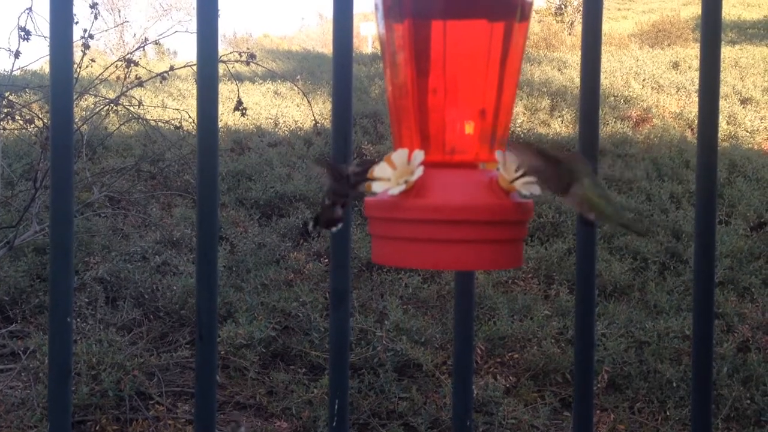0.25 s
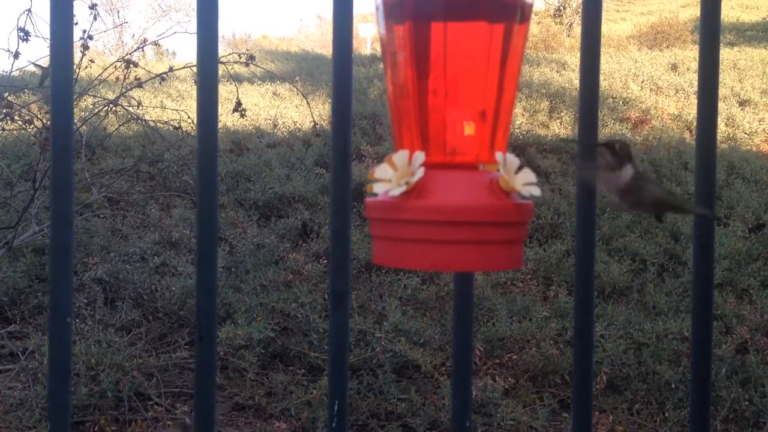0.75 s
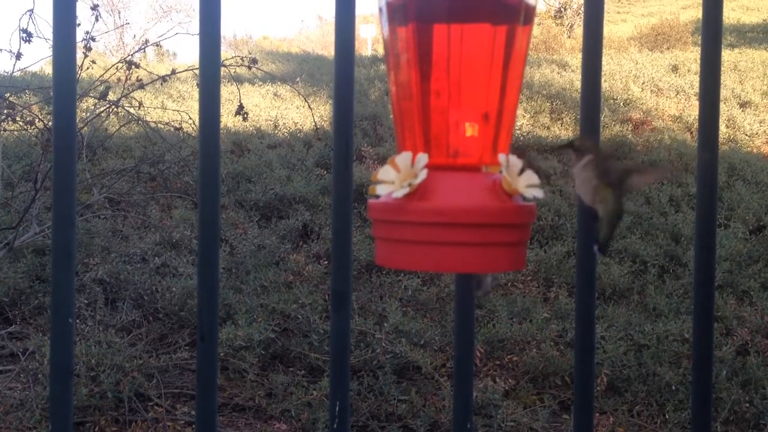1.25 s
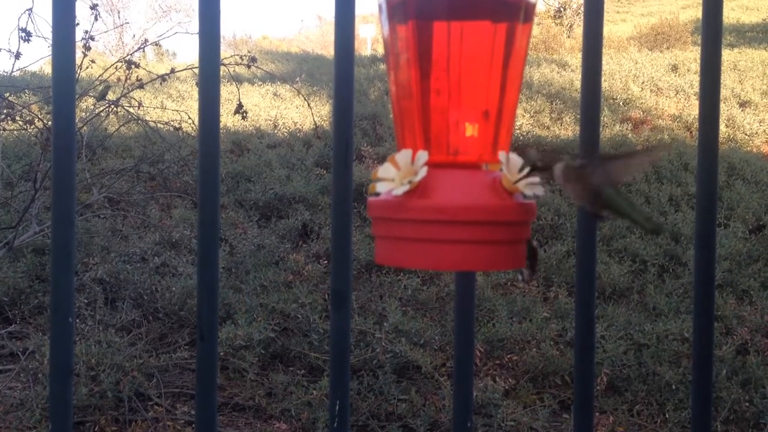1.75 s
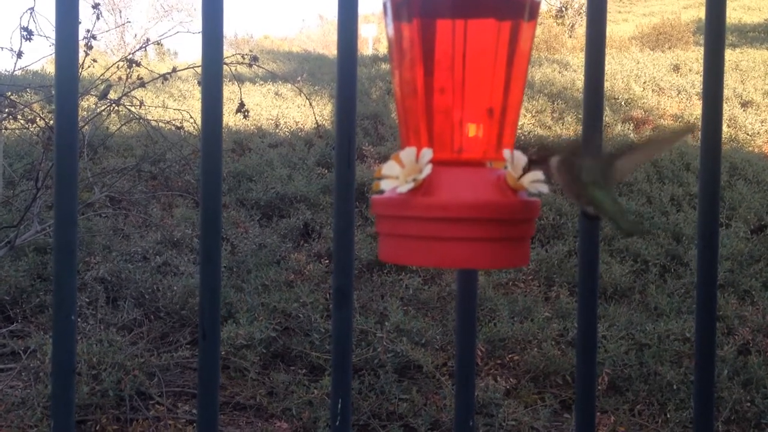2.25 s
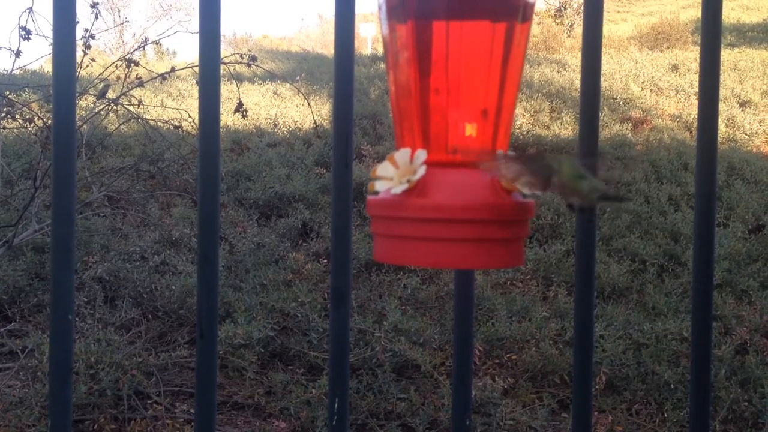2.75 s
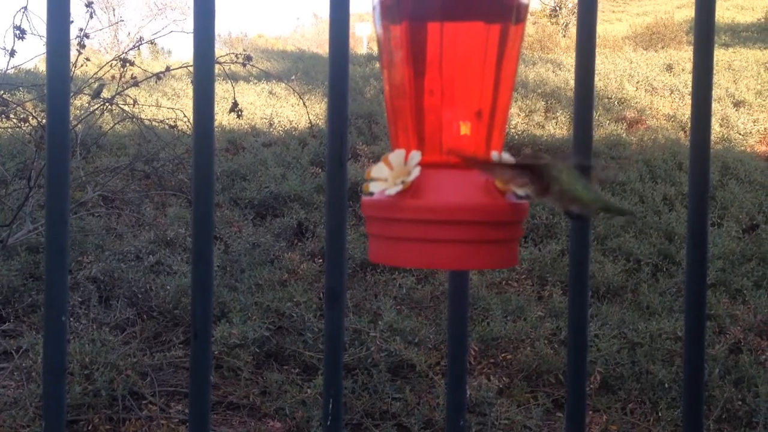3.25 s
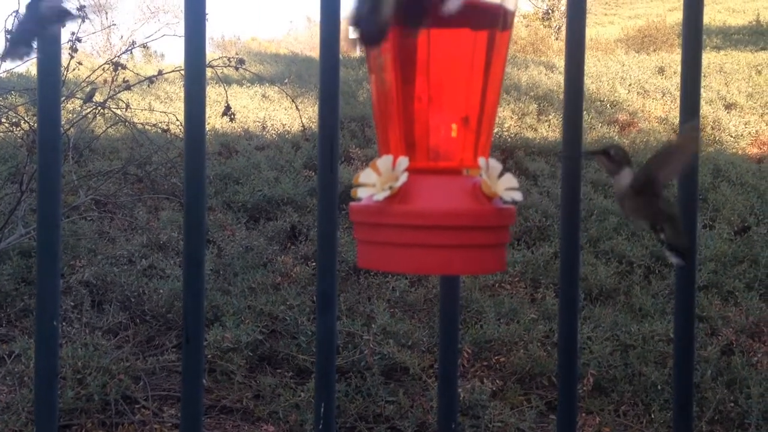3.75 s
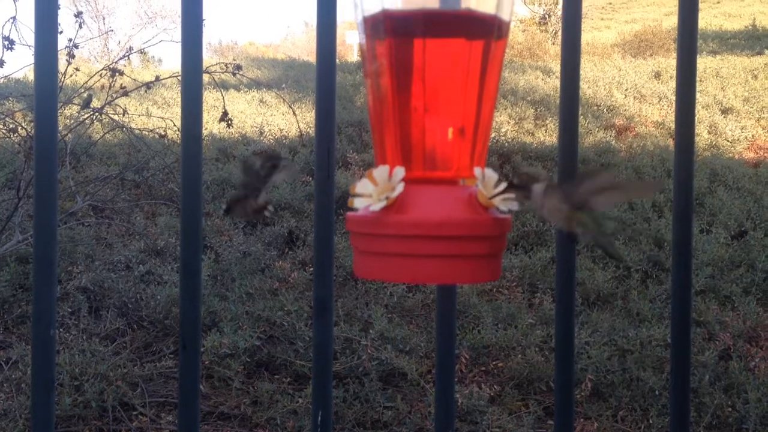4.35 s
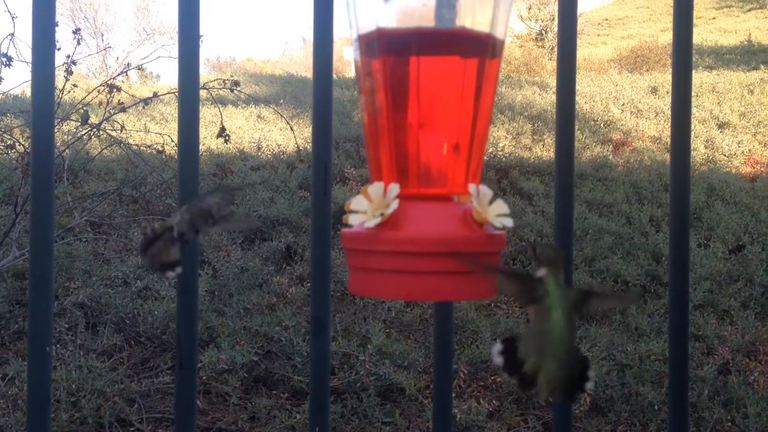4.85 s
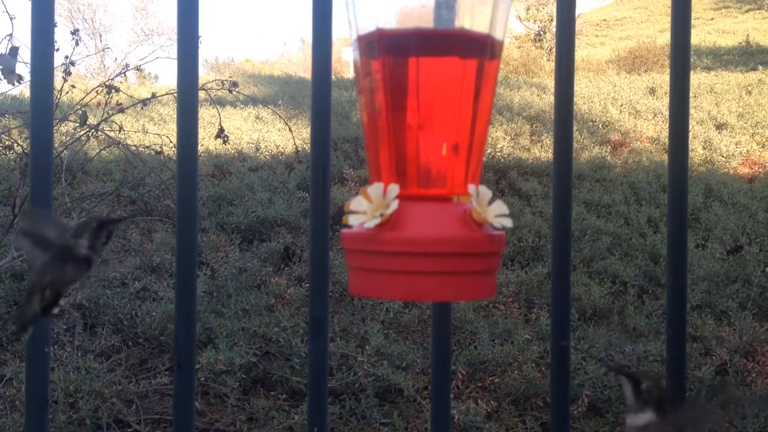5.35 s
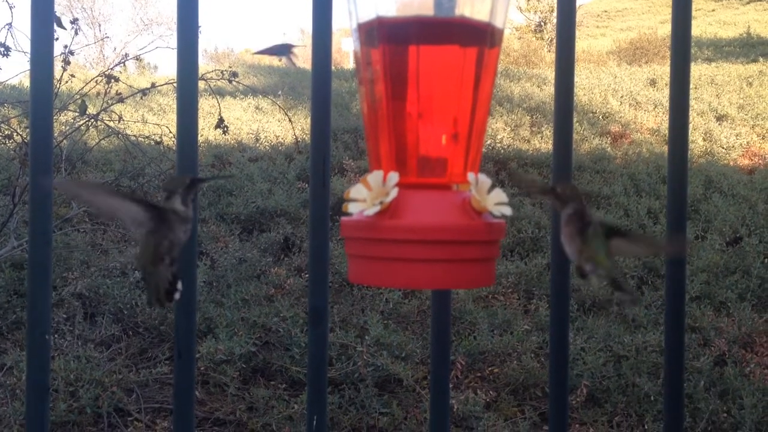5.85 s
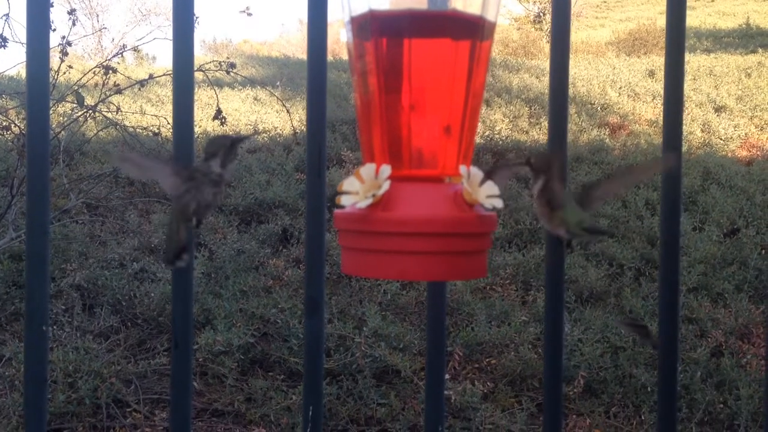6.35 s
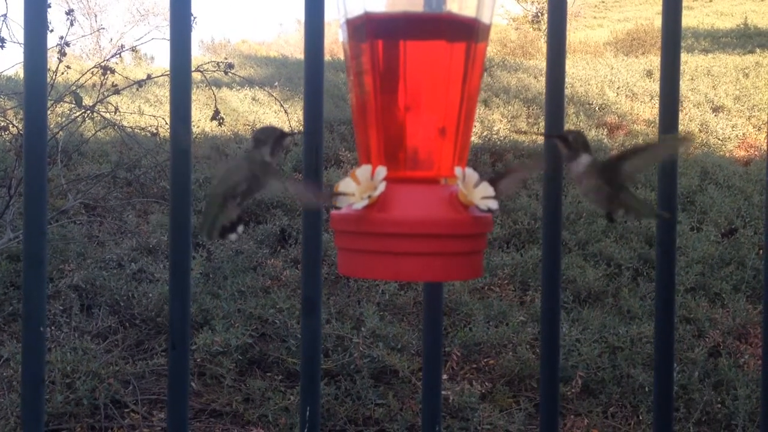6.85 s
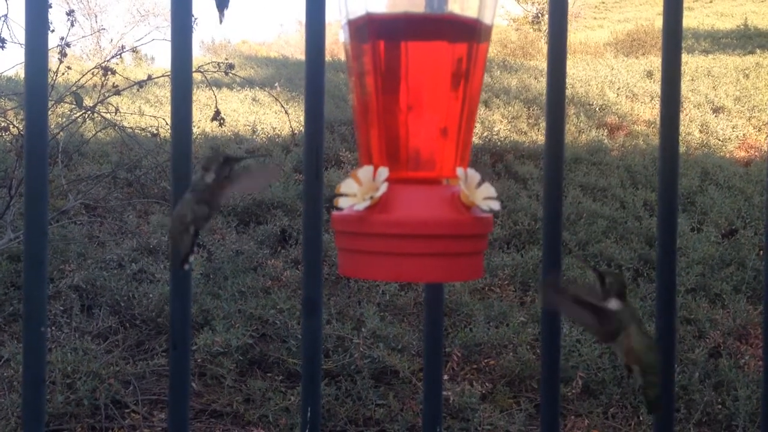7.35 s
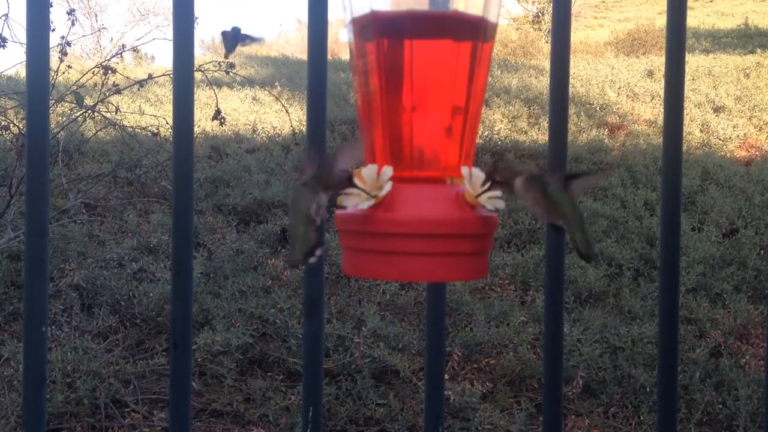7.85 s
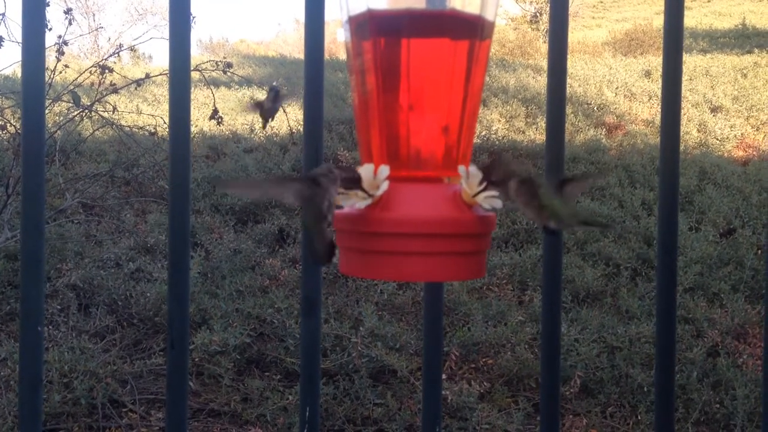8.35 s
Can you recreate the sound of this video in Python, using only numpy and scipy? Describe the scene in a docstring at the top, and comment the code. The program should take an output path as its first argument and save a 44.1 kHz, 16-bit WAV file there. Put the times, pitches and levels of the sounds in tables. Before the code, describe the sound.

Hummingbirds hover at a garden feeder close to the microphone, their wings making a low hum that swells and fades. Sharp, very high chips and a few thin twitters come throughout. Midway the squabble peaks with raspy squeals, a quick run of harsh chatter and soft thumps of air as the birds turn. More twitters and chips follow, with faint distant calls and a quiet outdoor hiss behind.

```python
"""Hummingbirds squabble at a garden feeder, close to the microphone.
The syrinx whistles rising chips, swinging twitters and scalloped squeals; harsh chatter falls through
the throat's resonances. Two pairs of wings hum at about 40-55 beats a second, stir eddies, thump the air
in sharp turns and once pass with a faint, rough swish. Fence and wall scatter the near calls, while far
birds buzz from the bushes over a quiet outdoor hiss."""
import sys
import numpy as np
from scipy import signal
from scipy.fft import rfft, irfft, next_fast_len
from scipy.io import wavfile
from scipy.ndimage import map_coordinates

SR = 44100
rng = np.random.default_rng(int(sys.argv[2]) if len(sys.argv) > 2 else 0)


def dump(signal):
    """Clip the signal to [-1, 1] and save it as 16-bit WAV at the path in sys.argv[1]."""
    limited = np.clip(np.atleast_2d(signal).T, -1, 1)
    pcm = np.round(limited * 32767).astype(np.int16)
    wavfile.write(sys.argv[1], SR, pcm)


N = 379701
TIME = np.arange(N) / SR

# hover of the slow-winged and the fast-winged bird: (time [s], wingbeat rate [Hz], level [dB])
SLOW_HOVER = [(0, 45, -59), (.29, 44.7, -53.5), (.46, 46.4, -64), (.76, 45.7, -43), (1.05, 43.7, -55.5),
              (2.1, 43.2, -59.5), (2.6, 41.3, -52), (2.95, 40.5, -52), (3.2, 39.6, -47.5),
              (3.5, 40.4, -55.5), (3.8, 44.2, -48.5), (4.75, 39, -49), (5.3, 44, -45.5), (6.06, 41, -57.5),
              (6.2, 41, -49), (7.2, 45, -55), (7.38, 45.1, -50), (7.6, 44.5, -60), (8.61, 45, -61)]
FAST_HOVER = [(0, 48.3, -60.5), (.75, 52.3, -58), (1, 52, -54.5), (1.75, 51, -53), (2.3, 50.7, -51.5),
              (3.2, 50.6, -54), (3.7, 48.3, -51), (4.05, 51.4, -51.5), (4.45, 49.7, -52.5),
              (4.68, 50.2, -65), (4.9, 51.7, -51.5), (5.3, 51, -53), (5.72, 57.3, -56), (5.87, 48, -47.5),
              (6.02, 52, -58), (6.26, 52.4, -53.5), (6.95, 53.2, -59), (7.2, 50.6, -46),
              (7.75, 52.7, -56.5), (8.15, 50.6, -52.5), (8.61, 49, -58)]
# timbre of each hum, from the first harmonic up: (relative level [dB])
SLOW_HUM_DB = [-15, -1, -5.5, -5.5, -12.5, -22.5, -25, -23.5, -23.5, -27]
FAST_HUM_DB = [-5.5, -2, 1.5, 0, -7.5, -12.5, -18, -18, -20.5, -24.5]
# swoops past the microphone: (closest time [s], fade time [s], eddy send [dB], swish send [dB])
FLY_BYS = [(.3, 0.43, -59, -67.5), (.78, .04, -52, -71), (2.28, 0.027, -54, -65.5), (2.39, 0.044, -56, -71),
           (2.68, 0.14, -67.5, -76), (3.69, 0.093, -48.5, -64.5), (4.05, 0.43, -68, -71.5),
           (4.47, 0.034, -53.5, -76), (4.88, 0.051, -54.5, -65), (5.08, 0.053, -58, -61),
           (5.18, 0.035, -53, -64), (5.37, 0.12, -52.5, -60), (5.571, 0.029, -45, -75),
           (5.809, 0.013, -45.5, -75), (6.24, .06, -61, -72), (6.72, 0.12, -75, -72),
           (7.2, .05, -57.5, -60.5), (7.41, 0.093, -60.5, -62.5), (8.1, 0.066, -65.5, -67),
           (8.5, 0.016, -62, -66)]
# colour of wing eddies, feather swish and garden hiss: (frequency [Hz], relative level [dB])
EDDY_EQ = [(30, -34), (50, 0), (120, 5), (250, -0.5), (400, -6.5), (550, -12), (800, -29), (1500, -58)]
SWISH_EQ = [(400, -8.5), (950, -2.5), (1800, -3), (2800, -10), (3800, -6), (7000, -14.5), (15000, -24)]
GARDEN_EQ = [(240, -42), (400, -9), (694, -11), (1000, -9), (1150, -10.5), (1690, -8.5), (2710, -16),
             (3510, -11.5), (8150, -16), (11100, -17), (14600, -17), (15500, -23)]
# calls of birds further off: (time [s], length [s], pitch [Hz], relative level [dB])
BUSH_CALLS = [ (.003, 0.012, 7740, -56), (0.181, 0.044, 8000, -61.5), (0.184, 0.038, 4890, -62.5),
              (0.262, 0.025, 7000, -59), (2.898, 0.024, 6780, -63), (3.143, 0.017, 6500, -59),
              (3.241, 0.012, 5180, -57), (3.308, 0.022, 7380, -62), (3.378, 0.013, 6600, -62.5),
              (7.619, 0.032, 7400, -63.5), (8.015, 0.044, 7220, -63), (8.019, 0.033, 4410, -62),
              (8.078, .032, 7377, -58.5), (8.080, 0.029, 4420, -66), (8.263, .020, 4206, -64),
              (8.254, 0.036, 7610, -64)]
# rising chips: (time [s], length [s], top pitch [Hz], level [dB])
PLAIN_CHIPS = [(0.08, 0.023, 10300, -30), (0.684, 0.015, 8830, -31), (1.356, .022, 10360, -38),
               (1.796, 0.016, 9996, -46.5), (2.377, .021, 10240, -36.5), (2.660, 0.02, 9680, -37.5),
               (2.947, 0.014, 9160, -38.5), (3.098, 0.014, 9390, -35.5), (3.634, 0.016, 9170, -42.5),
               (3.783, .0127, 9300, -36.5), (3.917, 0.016, 9280, -30.5), (4.328, 0.017, 9415, -31),
               (4.474, 0.015, 8970, -30.5), (4.910, 0.015, 8770, -32.5), (5.04, 0.017, 8880, -31.5),
               (5.938, 0.016, 9670, -30), (6.121, 0.013, 8800, -37), (6.841, 0.017, 9390, -29.5),
               (7.385, 0.019, 10080, -31.5), (7.844, 0.013, 9050, -36.5)]
# chips that shake at the top: (time [s], length [s], first pitch [Hz], top pitch [Hz], level [dB])
WARBLED_CHIPS = [(6.219, 0.023, 5300, 10000, -30.5), (6.314, 0.019, 8280, 9670, -28)]
# wing-tip flicks, single or in runs: (time [s], length [s], band centre [Hz], level [dB])
TIP_FLICKS = [(.593, .01, 3340, -59), (1.392, .01, 3710, -59), (3.748, .01, 3380, -48.5),
              (3.822, .01, 3200, -57), (5.489, .01, 1900, -50), (5.647, .01, 3800, -56),
              (7.17, .03, 3650, -50.5), (7.397, .09, 910, -54)]
# sharp turns of one or more hard strokes: (time [s], length [s], thump pitch [Hz], peak level [dB])
SHARP_TURNS = [(.740, .05, 138, -35.5), (2.383, .03, 98, -36), (3.603, .05, 83, -29),
               (3.658, .05, 205, -28), (3.729, .03, 153, -29), (3.932, .01, 100, -33.5),
               (4.444, .05, 161, -31.5), (4.636, .01, 80, -36), (4.764, .01, 90, -33),
               (4.864, .03, 165, -32.5), (5.163, .03, 171, -29), (5.23, .01, 110, -29),
               (5.286, .01, 129, -30.5), (5.55, .01, 101, -28.5), (5.573, .01, 270, -22),
               (5.61, .01, 169, -25.5), (5.809, .01, 260, -28.5), (5.902, .01, 140, -30.5),
               (5.968, .01, 90, -36.5), (6.363, .01, 61.5, -32.5)]
# short rasps; the one at 7.165 s is the faint, rough swish of passing wings, the rest are chatter:
# (time [s], length [s], first pitch [Hz], last pitch [Hz], roughness [0-1], tilt [dB/octave], level [dB])
RASPS = [ (1.047, 0.023, 2000, 1454, 0.07, -4.5, -45.5), (1.187, 0.033, 2006, 1655, 0.87, -5.5, -55),
         (1.495, .009, 2490, 1740, .6, -7, -52.5), (2.061, .023, 2390, 1576, 0.28, -3.5, -50),
         (2.248, 0.016, 2045, 1460, 0.3, 2, -42.5), (2.267, 0.025, 1890, 1470, 0.1, -1, -44),
         (2.704, 0.021, 2405, 1594, 0.3, -6, -43.5), (4.54, 0.026, 1900, 1494, 0.2, -0.5, -44.5),
         (4.825, .024, 2448, 1580, 0.46, -1, -51), (5.27, 0.032, 2600, 1500, 0.36, 0, -43),
         (5.371, 0.029, 4130, 1604, 0.11, 0.5, -33), (5.437, .031, 4240, 1560, 0.1, -0.5, -34.5),
         (5.51, 0.029, 4360, 1526, 0.25, 0.5, -34), (5.587, 0.033, 4070, 1580, 0.2, -0.5, -37.5),
         (5.678, 0.03, 4200, 1615, 0.3, -.5, -42), (5.776, .031, 4110, 1464, 0.23, -1.5, -39.5),
         (6.531, .016, 2250, 1550, .6, -7, -51), (6.894, 0.043, 2140, 1435, 0.23, -5.5, -53),
         (7.165, 0.054, 1943, 1600, 0.93, -5, -60), (7.374, .016, 2455, 1600, .55, -4.5, -50.5),
         (7.551, 0.028, 2285, 1435, .45, 1, -48), (7.665, 0.02, 2330, 1566, 0.36, -8.5, -48.5),
         (7.886, 0.016, 2320, 1590, 0.6, -6.5, -52.5), (8.499, 0.013, 2300, 1634, 0.42, -7.5, -46.5)]
# colour of the rasps; in the chatter, the resonances of throat and open bill: (frequency [Hz], gain [dB])
RASP_EQ = [(1300, -1), (1650, 1.5), (2000, -2.5), (2400, 7), (2900, -5.5), (3900, 1.5), (5300, 3.5),
           (7000, -0.5), (9000, -9), (12000, -15.5), (15000, -20)]
# twitters: (time [s], length [s], swing period [s], low pitch [Hz], high pitch [Hz], level [dB])
TWITTER_NOTES = [ (1.615, 0.11, 0.019, 6600, 11200, -43), (2.21, 0.0994, 0.019, 6700, 11180, -42.5),
                 (6.04, 0.08, 0.022, 6500, 11150, -29.5), (6.565, 0.03, .0212, 5550, 10850, -30.5),
                 (6.682, 0.036, 0.024, 5900, 10700, -30)]
# squeals, one curve each:
# (time [s], top pitch [Hz], dip depth [Hz], dip rate [Hz], roughness [0-1], level [dB])
SQUEAL_CURVES = [
    [(3.986, 6540, 200, 79, 0, -30.5), (4.014, 6600, 1620, 74, .05, -30), (4.066, 6620, 1670, 69, 0, -36),
     (4.085, 6420, 800, 76, .3, -36), (4.100, 6420, 900, 200, 0.1, -48.5),
     (4.135, 5400, 1950, 270, 0.5, -39), (4.144, 5290, 2250, 240, 1, -48)],
    [(5.063, 6700, 1600, 80, 0.1, -53), (5.076, 6730, 1630, 80, 0.02, -34), (5.088, 6700, 910, 74, .3, -45),
     (5.102, 6540, 1570, 81, 0.3, -33.5), (5.145, 6510, 2360, 81, 0.33, -33),
     (5.168, 6403, 2840, 77, 0.46, -40.5), (5.183, 5700, 3370, 84, .77, -40.5)],
    [(5.240, 5680, 2096, 247, .5, -39), (5.253, 5950, 2294, 233, 0.54, -30),
     (5.272, 5500, 2337, 220, 0.67, -34), (5.285, 4700, 2300, 255, 0.7, -39)],
]

TOP_HZ = 15550  # upper edge of the rasps and of the microphone


def undb(db):
    """Decibels to gain."""
    return 10 ** (np.asarray(db) / 20)


def unit(x):
    """Scale to rms 1."""
    return x / np.sqrt(np.mean(x ** 2))


def curves(rows, t):
    """The columns of a curve table at times t."""
    s, *columns = np.transpose(rows)
    return [np.interp(t, s, c) for c in columns]


def response(eq, hz):
    """Gain of an EQ curve at hz."""
    f, db = np.transpose(eq)
    return undb(np.interp(np.log(np.maximum(hz, 1)), np.log(f), db))


def noise(eq):
    """Noise coloured by an EQ curve, rms 1."""
    size = next_fast_len(N, True)
    spectrum = rfft(rng.standard_normal(size)) * response(eq, np.fft.rfftfreq(size, 1 / SR))
    return unit(irfft(spectrum, size)[:N])


def walk(rate, size=N):
    """Random modulator that glides to a new value rate times a second; spread near 1."""
    at = np.arange(size) * rate / SR
    return map_coordinates(rng.standard_normal(int(at[-1]) + 2), [at], order=1)


def phase_of(hz):
    """Running phase of a frequency curve."""
    return 2 * np.pi * np.cumsum(hz) / SR


def span(length):
    """Time axis of one sound."""
    return np.arange(int(max(length, .004) * SR)) / SR


def gate(t, attack, release):
    """Smooth fade in and out of a sound."""
    fade_in = np.sin(np.pi / 2 * np.clip(t / attack, 0, 1))
    return fade_in * np.sin(np.pi / 2 * np.clip((t[-1] - t) / release, 0, 1))


def add(track, s, sound):
    """Mix a sound into the track at time s."""
    i = max(int(s * SR), 0)
    track[i:i + len(sound)] += sound[:N - i]


def strokes(s, length, gap_s=.0205):
    """Times of the wing strokes in a run."""
    return s + np.arange(0, length, gap_s)


def hover(rows, harmonics_db, swoop, jitter, flutter, wander=.04):
    """Lift pulses on each stroke hum, the harmonics shifting as the bird tilts; returns hum and phase."""
    hz, db = curves(rows, TIME)
    phase = phase_of(hz * (1 + wander * walk(9) + jitter * walk(35)))
    hum = sum(undb(h) * (1 + flutter * walk(14)) * np.cos(k * phase + 2 * flutter * walk(9))
              for k, h in enumerate(harmonics_db, 1))
    return unit(hum) * np.hypot(undb(db), swoop), phase


def swoops():
    """Each fly-by swells and fades in a bell curve; returns the eddy and swish envelopes."""
    eddy, swish = np.zeros(N), np.zeros(N)
    for s, fade, eddy_db, swish_db in FLY_BYS:
        near = np.exp(-np.minimum(((TIME - s) / fade) ** 2, 20))
        eddy += undb(eddy_db) * near
        swish += undb(swish_db) * near
    return eddy, swish


def wings(sway_db=2.5, gust_db=1.14):
    """Two hums swell and fade as the birds dart about; the beats shed low eddies and feather swish."""
    swoop_eddy, swoop_swish = swoops()
    swoop_hum = undb(.5) * swoop_eddy
    slow, slow_phase = hover(SLOW_HOVER, SLOW_HUM_DB, swoop_hum, jitter=.03, flutter=.45)
    fast, fast_phase = hover(FAST_HOVER, FAST_HUM_DB, swoop_hum, jitter=.04, flutter=.42)
    hum = sum(bird * undb(-.5 + sway_db * walk(16)) for bird in (slow, fast))
    # the hum ducks under the hard strokes of a turn
    turning = sum(np.exp(-np.minimum(((TIME - s) / .016) ** 2, 20))
                  for row in SHARP_TURNS for s in strokes(*row[:2]))
    hum /= 1 + .31 * turning
    # the nearer the two birds hover, the more stirred air is heard
    stir_db = (curves(SLOW_HOVER, TIME)[1] + curves(FAST_HOVER, TIME)[1]) / 2 + gust_db * walk(8)
    eddy_level = np.hypot(undb(stir_db - 3), undb(7) * swoop_eddy)
    swish_level = np.hypot(undb(stir_db - 18.5), undb(2.5) * swoop_swish)
    eddies = noise(EDDY_EQ) * unit(1 + .69 * np.cos(2 * slow_phase)) * eddy_level
    feathers = noise(SWISH_EQ) * unit(np.exp(.55 * np.cos(fast_phase))) * swish_level
    return hum + eddies + feathers


def garden_hiss(level_db=-64, drift_db=.5):
    """A quiet bed of outdoor hiss whose level drifts slightly."""
    return noise(GARDEN_EQ) * undb(level_db + drift_db * walk(2.25))


def whistle(hz, overtone_db):
    """A nearly pure tone of the syrinx with a weaker octave; rms near 1."""
    phase = phase_of(hz)
    alias_guard = np.clip((SR * .4 - 2 * hz) / 2000, 0, 1)
    return np.sqrt(2) * (np.sin(phase) + undb(overtone_db) * alias_guard * np.sin(2 * phase))


def far_calls(waver=.2):
    """Buzzy calls from the bushes, their pitch fluttering widely."""
    out = np.zeros(N)
    for s, length, hz, db in BUSH_CALLS:
        t = span(length)
        buzz = whistle(hz * (1 + waver * walk(600, len(t))), overtone_db=-27)
        add(out, s, undb(db) * gate(t, .0016, .0077) * buzz)
    return out


def chip(length, first_hz, top_hz, rise_s, warble_depth_hz=0, warble_rate_hz=229):
    """Tension snaps the pitch up and lets it sag past the top; the note swells as it climbs."""
    t = span(length)
    climb = np.interp(t / rise_s, [0, .42, .8, 1, 1.4, 2], [.003, .33, .88, 1, .76, .81])
    warble = warble_depth_hz * np.sin(2 * np.pi * warble_rate_hz * t)
    hz = first_hz + climb * (top_hz - first_hz + warble)
    swell = undb(np.interp(t / t[-1], [0, .55, .8, 1], [-21, -3, -5, -19]))
    return swell * gate(t, .00045, .0017) * whistle(hz, overtone_db=-15)


def chips(start_hz=5480, climb_hz_per_s=296000):
    """Plain chips all start from one pitch and climb at one mean speed; warbled ones shake at the top."""
    out = np.zeros(N)
    for s, length, top_hz, db in PLAIN_CHIPS:
        rise_s = (top_hz - start_hz) / climb_hz_per_s
        add(out, s, undb(db) * chip(length, start_hz, top_hz, rise_s))
    for s, length, first_hz, top_hz, db in WARBLED_CHIPS:
        add(out, s, undb(db) * chip(length, first_hz, top_hz, rise_s=.0113, warble_depth_hz=545))
    return out


def flicks(puff_s=.012, width=.12):
    """Feather tips cut the air: once a stroke, a short puff of noise around one pitch."""
    out, t = np.zeros(N), span(puff_s)
    for start, length, hz, db in TIP_FLICKS:
        band = signal.butter(1, [hz / (1 + width), hz * (1 + width)], "band", fs=SR, output="sos")
        for s in strokes(start, length):
            puff = unit(signal.sosfilt(band, rng.standard_normal(len(t))))
            add(out, s - puff_s / 2, undb(db) * puff * np.hanning(len(t)))
    return out


def turn_thumps(width_cycles=.37, swish_db=-32, uneven_db=1.7):
    """Each hard stroke of a turn pushes out one short pressure wave, with a brush of feather noise."""
    thumps, brush = np.zeros(N), np.zeros(N)
    t = span(.06) - .03
    for start, length, hz, db in SHARP_TURNS:
        for s in strokes(start, length):
            peak = undb(db + uneven_db * rng.standard_normal())
            push = peak * np.exp(-.5 * (t * hz / width_cycles) ** 2)
            add(thumps, s + t[0], push * np.cos(2 * np.pi * hz * t))
            add(brush, s + t[0], push)
    return thumps + undb(swish_db) * brush * noise(SWISH_EQ)


def chatter_and_wing_swish(jitter=.094, flicker=.24):
    """Unsteady harmonics slide down through resonances: harsh chatter, or a faint, rough wing swish."""
    out, harmonics = np.zeros(N), np.arange(1, 10)[:, None]
    for s, length, first_hz, last_hz, rough, tilt_db, db in RASPS:
        t = span(length)
        progress = t / t[-1]
        # the pitch drops fast, rests on a shoulder, then falls away
        shoulder_hz = 1.2 * last_hz
        early = np.interp(progress, [0, .12, .35, .65], [.99, .86, .26, .019])
        late = np.interp(progress, [.6, .78, 1], [0, .2, 1])
        hz = shoulder_hz + early * (first_hz - shoulder_hz) + late * (last_hz - shoulder_hz)
        hz *= 1 + jitter * rough * walk(1400, len(t))
        unsteady = np.exp(flicker * np.array([walk(231, len(t)) for _ in harmonics]))
        timbre = response(RASP_EQ, harmonics * hz) * undb(tilt_db * np.log2(harmonics))
        gains = timbre * unsteady * (harmonics * hz < TOP_HZ)
        stack = (gains * np.sin(harmonics * phase_of(hz))).sum(0)
        swell = undb(np.interp(progress, [0, .35, .7, 1], [-.5, -.5, -3, -1]))
        shimmer = 1 + rough * walk(708, len(t))
        add(out, s, undb(db) * unit(stack) * swell * shimmer * gate(t, .0054, .0024))
    return out


def twitters(lead_s=.0044, sink_hz_per_s=8000, fade_db=9):
    """After a short lead-in a whistle swings up and down, shrinking and fading, weakest in the troughs."""
    out = np.zeros(N)
    for s, length, period, low_hz, high_hz, db in TWITTER_NOTES:
        t = span(length + lead_s) - lead_s
        swing = np.abs(np.sin(np.pi * np.maximum(t, 0) / period)) ** 1.6
        hz = low_hz + swing * (high_hz - low_hz - sink_hz_per_s * t)
        swing_db = np.interp(swing, [0, .25, .7, 1], [-15, -1.5, -2.5, -5.5])
        effort = undb(db + swing_db - fade_db * (t / length) ** 2)
        add(out, s - lead_s, effort * gate(t + lead_s, .0098, .0051) * whistle(hz, overtone_db=-21.5))
    return out


def squeals(jitter=.076, shimmer=.54, merge_hz=260, dip_db=8, uneven=.289, wander=.0092, drift=.105):
    """A held whistle is pulled down in narrow, uneven dips; when they come fast they merge to a rasp."""
    out = np.zeros(N)
    for rows in SQUEAL_CURVES:
        start, end = rows[0][0], rows[-1][0]
        t = span(end - start)
        top_hz, depth_hz, dip_rate, rough, db = curves(rows, start + t)
        dip_rate *= 1 + uneven * rough * walk(300, len(t)) + drift * walk(70, len(t))
        narrowness = np.maximum(2, (merge_hz / dip_rate) ** 2)
        dip = np.abs(np.cos(phase_of(dip_rate) / 2)) ** narrowness
        held_hz = top_hz * (1 + wander * walk(199, len(t)))
        hz = held_hz - depth_hz * dip * (1 + uneven * walk(150, len(t)))
        hz *= 1 + jitter * rough * walk(2500, len(t))
        effort = undb(db - dip_db * dip) * (1 + shimmer * rough * walk(1500, len(t)))
        voice = whistle(hz, overtone_db=-19.5 + 14 * rough + 12.4 * dip)
        add(out, start, effort * gate(t, .00092, .0014) * voice)
    return out


def scatter(x, t60, predelay_s):
    """Dense, dying reflections with about the same energy as the sound."""
    t = span(.4)
    tail = rng.standard_normal(len(t)) * np.exp(-np.log(1000) * t / t60) * (t > predelay_s)
    return signal.fftconvolve(x, tail / np.linalg.norm(tail))[:N]


def scene():
    """Mono mix: near calls and the rough wing swish glance off fence and wall; far calls sit wetter."""
    near = chips() + twitters() + squeals() + chatter_and_wing_swish()
    far = far_calls()
    fence = undb(-8.5) * scatter(near, t60=.031, predelay_s=.0012)
    wall = undb(-18.5) * scatter(near, t60=.088, predelay_s=.012)
    bushes = undb(1) * far + undb(-2.5) * scatter(far, t60=.14, predelay_s=.00067)
    garden = garden_hiss()
    return (near + fence + wall + bushes + wings() + turn_thumps() + flicks() + garden)[None]


def record(dry):
    """The microphone drops the deep bass and the very top."""
    low_cut = signal.butter(3, 32, "high", fs=SR, output="sos")
    high_cut = signal.ellip(10, .2, 70, TOP_HZ, fs=SR, output="sos")
    return signal.sosfilt(high_cut, signal.sosfilt(low_cut, dry))


dry = scene()
out = record(dry)
dump(out)
```